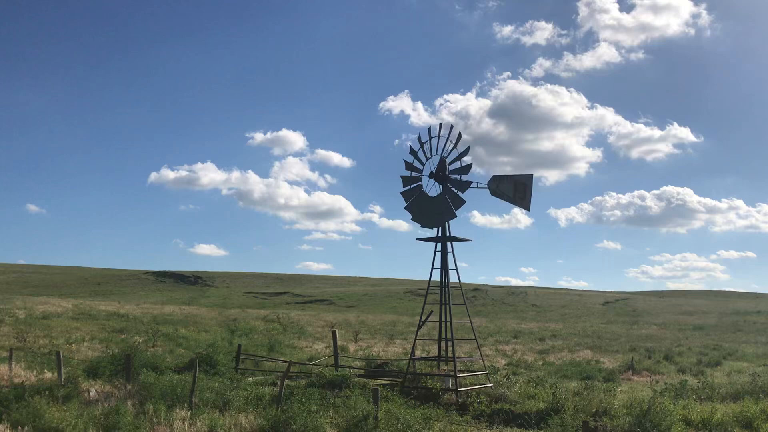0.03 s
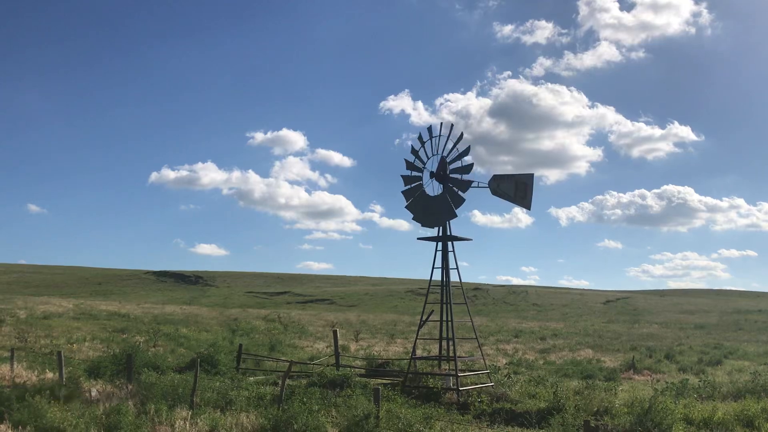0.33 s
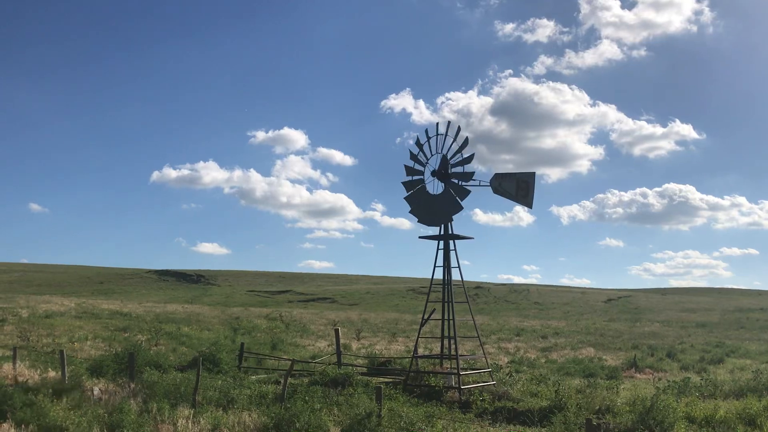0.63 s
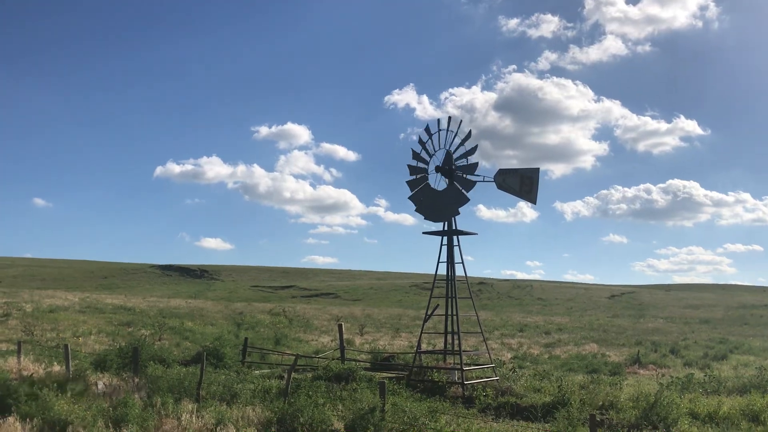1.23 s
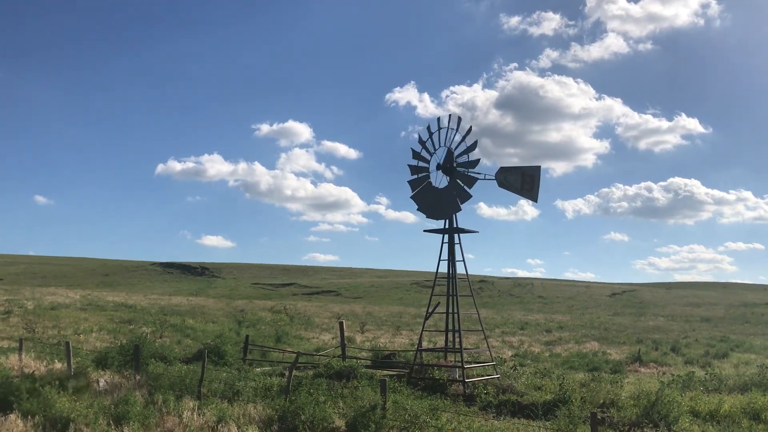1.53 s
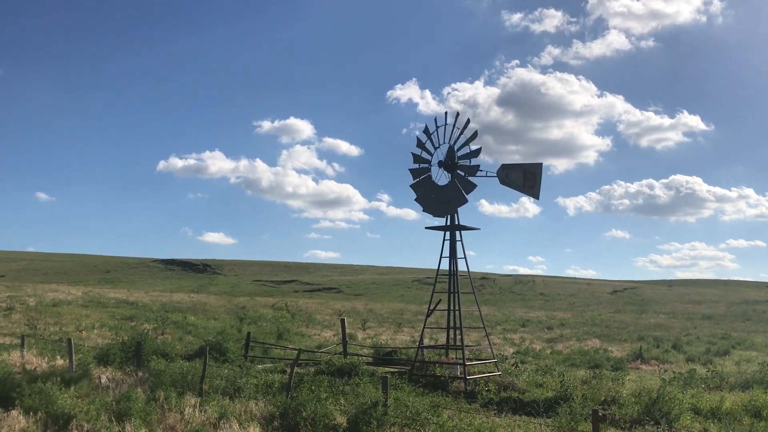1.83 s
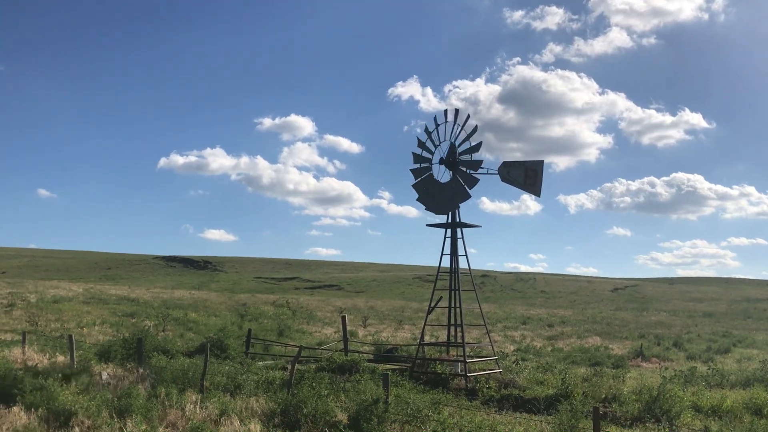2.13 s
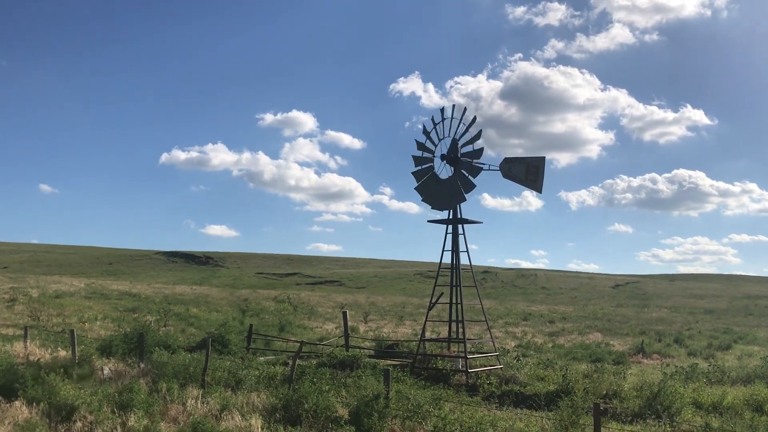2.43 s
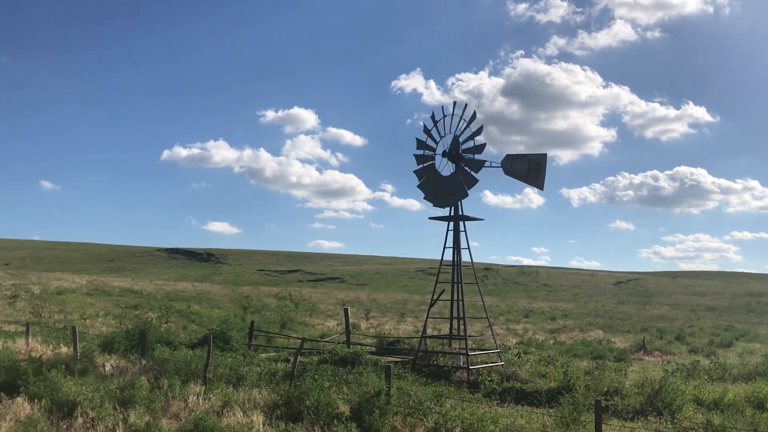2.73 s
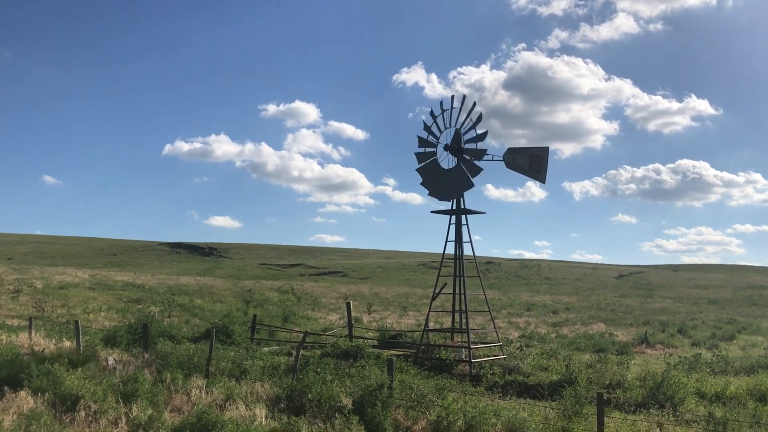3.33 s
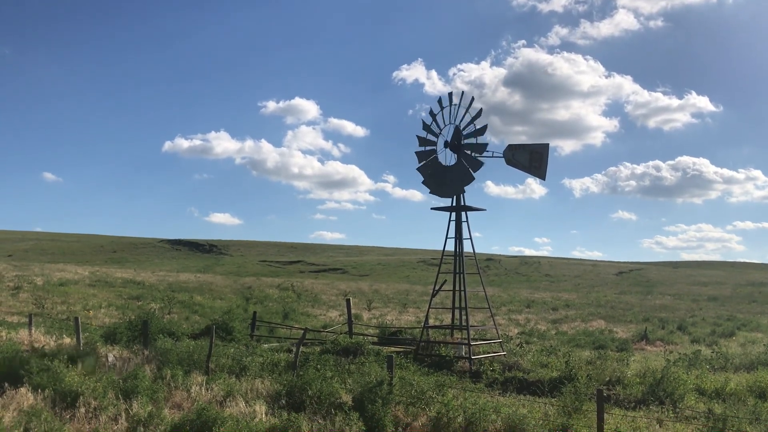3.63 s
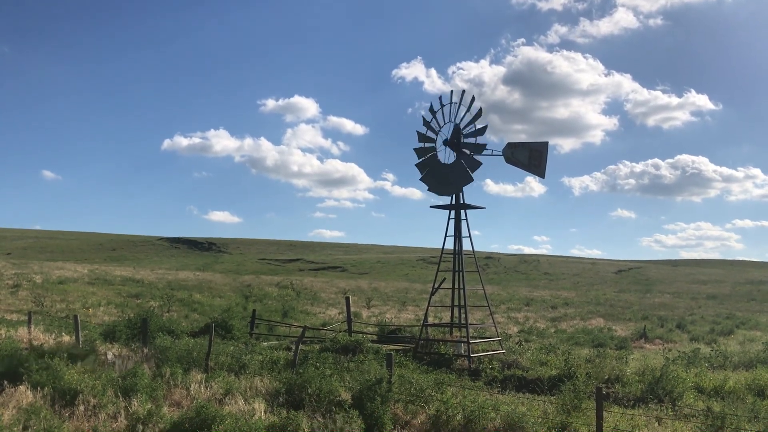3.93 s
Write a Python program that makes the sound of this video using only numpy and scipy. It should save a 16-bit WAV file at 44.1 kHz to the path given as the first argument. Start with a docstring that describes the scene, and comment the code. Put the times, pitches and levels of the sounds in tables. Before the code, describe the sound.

Gusty wind rumbles on the microphone, with crickets chirping and one distant bang.

```python
"""Wind buffets the microphone in uneven gusts, rumbling and thumping, on an open prairie.
Grass hisses, ticks and brushes together. Crickets scrape their wings: one chirps close by and one
further out, over a far chorus of trills and chirps and the high rattle of katydids.
A few distant bangs roll over the hills, and a far bird adds thin calls and a falling whistle."""
import sys
import numpy as np
from scipy import signal
from scipy.fft import rfft, irfft
from scipy.io import wavfile
from scipy.ndimage import uniform_filter1d

SR = 44100
rng = np.random.default_rng(int(sys.argv[2]) if len(sys.argv) > 2 else 0)


def store_pcm(level_fs):
    """Save levels as 16-bit WAV."""
    pcm = np.round(np.clip(level_fs, -1, 1) * 32767).astype(np.int16)
    wavfile.write(sys.argv[1], SR, np.atleast_2d(pcm).T)


N = 176400
T = np.arange(N) / SR
FREQS = np.fft.rfftfreq(N, 1 / SR)


def amp(db):
    """Turns decibels into a number to multiply a sound by."""
    return 10 ** (np.asarray(db) / 20)


def unit(x):
    """Scales a sound to an average strength (rms) of 1."""
    return x / np.sqrt(np.mean(x ** 2) + 1e-30)


def read(points, hz):
    """Looks up a table by frequency, sliding smoothly between its rows."""
    freqs, values = np.transpose(points)
    return np.interp(np.log(hz + 1), np.log(freqs), values)


def add(mix, at, sound):
    """Mixes a sound in, starting at a time in seconds."""
    part = mix[max(round(at * SR), 0):][:len(sound)]
    part += sound[:len(part)]


def noise(colour):
    """Noise with a given colour: its balance of low and high frequencies."""
    return unit(irfft(rfft(rng.standard_normal(N)) * amp(read(colour, FREQS)), N))


def drift(hz):
    """A random wobble, mostly slower than the given rate."""
    return unit(irfft(rfft(rng.standard_normal(N)) / (1 + (FREQS / hz) ** 4), N))


def rise_and_fade(rise_s, fade_s):
    """A loudness shape that climbs quickly and dies away, losing 60 dB every fade_s."""
    return np.minimum(T / rise_s, 1) * amp(-60 * T / fade_s)


def scatter(sound, fade_s):
    """The blur of many tiny echoes from grass and ground."""
    t = T[:SR // 2]
    tail = rng.standard_normal(len(t)) * amp(-60 * t / fade_s) * (t > .003)
    return signal.fftconvolve(sound, tail / np.linalg.norm(tail))[:N]


def turbulence(colour, swirl_db, window):
    """Noise broken into short swirls, then evened out over a window of samples."""
    rough = noise(colour) * amp(swirl_db)
    power = uniform_filter1d(uniform_filter1d(rough ** 2, window), window)
    return rough / np.sqrt(power + 1e-12)


# how the gusts rise and fall (time [s], relative rumble level [dB], relative flutter level [dB])
GUSTS = [(.04, -20, -23.5), (0.059, -28.5, -36), (0.089, -32, -41), (0.138, -25, -31.5), (0.191, -38, -48),
         (.22, -27, -36.5), (0.259, -37.5, -59), (0.306, -16.5, -25), (.32, -35, -30), (0.342, -27, -42),
         (0.402, -28, -42), (0.434, -44, -72), (0.459, -29.5, -38), (0.488, -36.5, -52), (0.519, -28, -48),
         (.58, -28.5, -38.5), (.66, -32, -34), (.695, -30.5, -47), (.75, -29.5, -40), (.82, -36, -55),
         (0.866, -27, -29.5), (.89, -31.5, -42.5), (0.942, -31.5, -40.5), (1.021, -48.5, -86),
         (1.06, -40.5, -79), (1.1, -45, -78), (1.151, -25.5, -49), (1.17, -24, -41.5), (1.221, -33, -45.5),
         (1.265, -47.5, -74), (1.288, -29, -65), (1.325, -44, -67), (1.374, -26, -60), (1.414, -31, -33),
         (1.462, -25.5, -45.5), (1.52, -48, -68), (1.6, -52.5, -88), (1.63, -38, -56), (1.69, -28.5, -51),
         (1.79, -30, -41.5), (1.821, -37, -55), (1.895, -23, -39.5), (1.919, -34, -46.5),
         (2.05, -32, -46.5), (2.069, -41, -63), (2.098, -29.5, -43), (2.351, -31.5, -52),
         (2.409, -23.5, -32.5), (2.48, -32.5, -42), (2.556, -28.5, -37), (2.591, -45, -64),
         (2.69, -43.5, -81), (2.734, -30.5, -35), (2.822, -31, -37.5), (2.86, -30, -41.5),
         (2.895, -30.5, -37), (2.94, -32, -46.5), (2.98, -25, -37), (3.02, -34, -58), (3.07, -27.5, -40.5),
         (3.129, -33, -35), (3.175, -47, -69.5), (3.261, -26.5, -41.5), (3.36, -47.5, -62),
         (3.428, -30, -40.5), (3.47, -33.5, -53.5), (3.53, -30, -40), (3.59, -48, -69), (3.69, -43.5, -65),
         (3.768, -29, -53.5), (3.82, -38.5, -57), (3.91, -30.5, -56.5), (3.99, -24, -36)]
# colours of the deep rumble and the flutter above it (frequency [Hz], level [dB])
RUMBLE_COLOUR = [(15, -34), (28, -21.5), (50, -1.5), (85, 3), (160, 0.5), (250, -3), (340, -15.5),
                 (480, -43), (800, -52), (1600, -76)]
FLUTTER_COLOUR = [(100, -8), (250, 6.5), (380, 3.5), (560, -2.5), (760, -17.5), (1050, -28.5),
                  (1600, -41.5), (3000, -51.5), (8000, -75)]
# single swirls of air that hit the microphone (time [s], peak level [dB], half width [s])
THUMPS = [(0.059, -23, 0.00093), (.140, -17.5, 0.0011), (.302, -10.5, 0.0016), (.318, -21, 0.0011),
          (.359, -35, 0.00069), (.610, -13.5, 0.0014), (.654, -20, 0.0015), (.866, -21.5, 0.001),
          (.937, -31, 0.0016), (1.172, -19.5, 0.0016), (2.045, -33, 0.00098), (2.441, -16.5, 0.0015),
          (2.778, -19.5, 0.0016), (2.981, -20, 0.0014), (3.07, -22, 0.0011)]


def wind():
    """Gusts drive a rumble and a rougher flutter; the hardest swirls land as single thumps."""
    times, rumble_db, flutter_db = np.transpose(GUSTS)
    swirls = drift(hz=53.3)
    rumble = turbulence(RUMBLE_COLOUR, 2 * swirls, window=1300)
    flutter = turbulence(FLUTTER_COLOUR, 4.5 * swirls, window=1400)
    out = rumble * amp(np.interp(T, times, rumble_db) + .5)
    out += flutter * amp(np.interp(T, times, flutter_db) + 2.5)
    for at, db, half_width in THUMPS:
        offset = (T - at) / half_width
        out += amp(db) * (1 - 3 * offset ** 2) / (1 + offset ** 2) ** 3  # a push between two dips
    low_cut = signal.butter(2, 19.2, "high", fs=SR, output="sos")
    return signal.sosfilt(low_cut, out)


# colour of the hissing grass (frequency [Hz], level [dB])
HISS_COLOUR = [(30, 5), (200, 21.5), (600, 4.5), (1000, 4.5), (2000, -4), (3300, -6), (4900, -6.5),
               (7000, -8.5), (8400, -9), (10500, -9.5), (16000, -18)]


def grass_hiss():
    """The soft, steady hiss of grass in the breeze."""
    return amp(-64.5) * noise(HISS_COLOUR)


def wing_stroke(hz, sag_hz_per_s, length_s=.016, snap_hz=0, rise_s=.0016):
    """One wing scrapes the other's ridges; the tone sags as the scrape slows."""
    t = np.arange(0, length_s, 1 / SR)
    pitch = hz - sag_hz_per_s * t + snap_hz * np.exp(-t / .00065)  # the snap lifts the very start
    phase = 2 * np.pi * np.cumsum(pitch) / SR
    edges = np.minimum(t / rise_s, 1) * np.minimum((length_s - t) / .0035, 1)
    droop = 1 - .27 * t / length_s
    return edges * droop * (np.sin(phase) + amp(-21.5) * np.sin(2 * phase))


# far crickets that trill without a break (pitch [Hz], strokes per second [1/s], level [dB])
TRILLS = [(4268, 59.5, -68.5), (4245, 62, -72.5), (3893, 45, -78.5)]


def trilling_crickets():
    """Endless runs of quick wing strokes at a slightly uneven pace, blurred by distance."""
    out = np.zeros(N)
    sag_hz_per_s = 45000
    for hz, rate, db in TRILLS:
        trill, length_s = np.zeros(N), .74 / rate
        top_hz = hz + sag_hz_per_s * length_s / 2
        late, detune, loudness = rng.standard_normal((280, 3)).T
        starts = np.cumsum(1 + .05 * late) / rate
        for at, start_hz, stroke_db in zip(starts, top_hz + 25 * detune, .79 * loudness):
            add(trill, at, amp(stroke_db) * wing_stroke(start_hz, sag_hz_per_s, length_s, rise_s=.0051))
        out += amp(db) * unit(trill + amp(-2.5) * scatter(trill, fade_s=.2))
    return out


def cricket_chorus():
    """Three-stroke chirps from many far crickets merge into a shimmer."""
    out = np.zeros(N)
    chirps_per_s = 14
    for slot, (late, detune, loudness) in enumerate(rng.random((chirps_per_s * N // SR, 3))):
        stroke = amp(8 * loudness) * wing_stroke(5320 + 380 * detune, sag_hz_per_s=16000, rise_s=.003)
        for n in range(3):
            add(out, (slot + late) / chirps_per_s + n * .032, stroke)
    return amp(-85.5) * unit(out + 1.2 * scatter(out, fade_s=.51))


def rasp(colour, level_db, beat_hz, depth, grain_db):
    """Tiny wing teeth strike in a dry rasp, pulsed by the wing beat; when faint it blurs into a hiss."""
    pace_hz = beat_hz * (1 + .046 * drift(hz=12))
    beat = np.sin(2 * np.pi * np.cumsum(pace_hz) / SR)
    clarity = np.interp(level_db, [-77, -66], [0, 1])
    pulses = 1 + depth * clarity * np.tanh(2 * beat)
    teeth = noise(colour) * amp(grain_db * drift(hz=500))
    return amp(level_db) * unit(teeth * pulses)


# loudness of two katydids (time [s], lower singer's level [dB], higher singer's level [dB])
KATYDID_LEVELS = [(.05, -70, -71), (0.171, -65, -66), (.27, -64.5, -64), (.39, -72.5, -69),
                  (.5, -72.5, -68), (.62, -68, -67), (.75, -69.5, -73), (1.09, -67, -66), (1.25, -73, -71),
                  (1.68, -73, -74), (1.77, -72, -63), (1.98, -75, -85), (2.12, -76, -71),
                  (2.55, -74.5, -72), (2.9, -74, -73), (3.39, -77.5, -67), (3.53, -67.5, -59),
                  (3.62, -71, -71), (3.73, -69, -64), (3.97, -75.5, -81)]
# colours of their rasps (frequency [Hz], level [dB])
LOW_RASP_COLOUR = [(7000, -39), (10500, -28), (11400, -5), (12100, -8), (12550, -1.5), (13050, 1),
                   (13700, -11), (14300, -1.5), (15800, -7)]
HIGH_RASP_COLOUR = [(7000, -40), (11000, -31.5), (13500, -11), (14500, 1), (15700, -2), (17000, -5.5)]


def katydids():
    """Two katydids, relatives of crickets, swell and fade in the waving grass."""
    times, low_db, high_db = np.transpose(KATYDID_LEVELS)
    lower = rasp(LOW_RASP_COLOUR, np.interp(T, times, low_db), beat_hz=43, depth=.86, grain_db=1.5)
    higher = rasp(HIGH_RASP_COLOUR, np.interp(T, times, high_db), beat_hz=48, depth=.26, grain_db=3)
    return lower + higher


# chirps of the near cricket (time [s], last stroke's level [dB], average stroke spacing [s],
# first stroke's length [s], first stroke's level [dB])
NEAR_CHIRPS = [(0.077, -50.5, 0.032, 0.015, -56), (.337, -51, .0335, 0.0076, -54),
               (0.663, -50, 0.032, 0.014, -52.5), (1.282, -48.5, 0.034, 0.015, -55),
               (1.542, -48, 0.031, 0.014, -51.5), (1.867, -48, .034, 0.009, -54),
               (2.222, -47.5, .033, 0.014, -52.5), (2.886, -47, 0.032, 0.012, -56)]


def near_cricket():
    """Three wing strokes to a chirp, each higher and louder than the one before."""
    out = np.zeros(N)
    wing_hz, glide = 5862, dict(sag_hz_per_s=33300, snap_hz=340)
    for at, db, spacing, first_s, first_db in NEAR_CHIRPS:
        add(out, at, amp(first_db) * wing_stroke(wing_hz - 130, length_s=first_s, **glide))
        add(out, at + .92 * spacing, amp(db - 1.5) * wing_stroke(wing_hz - 30, length_s=.01648, **glide))
        add(out, at + 2 * spacing, amp(db) * wing_stroke(wing_hz, **glide))
    out *= 1 + .14 * drift(hz=700)  # slight roughness
    return out + amp(-19) * scatter(out, fade_s=.15)


# chirps of a cricket further out (time [s], level [dB])
FAINT_CHIRPS = [(.195, -71), (0.439, -70), (.94, -74), (1.19, -72), (3.36, -76), (3.6, -77)]


def faint_cricket():
    """A fainter cricket, with three equal wing strokes to a chirp."""
    out = np.zeros(N)
    stroke = wing_stroke(5600, sag_hz_per_s=22000, rise_s=.0017)
    for at, db in FAINT_CHIRPS:
        for n in range(3):
            add(out, at + n * .036, amp(db) * stroke)
    return out + .5 * scatter(out, fade_s=.2)


# ticks of dry stalks (time [s], level [dB])
TICKS = [(.43, -61), (3.72, -73)]
# colour of a tick (frequency [Hz], level [dB])
TICK_COLOUR = [(1000, -14), (3000, 9), (5000, 3), (7100, 2), (9000, -4), (15000, -2)]


def stalk_ticks():
    """Dry grass stalks tick: sudden bits of noise that die at once."""
    out = np.zeros(N)
    for at, db in TICKS:
        add(out, at, amp(db) * noise(TICK_COLOUR) * amp(-60 * T / .06))
    return out


# distant bangs (time [s], level [dB])
BANGS = [(.812, -62), (1.41, -69), (1.753, -67), (2.312, -48)]
# colour of a bang (frequency [Hz], level [dB])
BANG_COLOUR = [(200, -5), (700, -9), (1050, -2), (1230, -1), (1345, 5.5), (1460, -7), (1750, -5),
               (1900, -5.5), (2250, -4.5), (2750, -8.5), (3100, -11.5), (3370, -4), (3650, -16),
               (4500, -15), (6500, -30), (12000, -44)]
# how long a bang lingers (frequency [Hz], time to fade by 60 dB [s])
BANG_FADES = [(300, 0.8), (1300, 0.64), (3000, 0.58), (8000, 0.52)]
# later echoes from the hills (time [s], level [dB])
ECHOES = [(1.075, -65), (2.71, -62)]
# colour of the rolls and echoes (frequency [Hz], level [dB])
ECHO_COLOUR = [(200, -3), (900, 0.5), (1400, -1), (2200, -8.5), (3400, -14.5), (6000, -28.5),
               (12000, -51.5)]


def bangs():
    """Each far bang is a burst that loses its highs first; the hills send back a duller roll."""
    out = np.zeros(N)
    for at, db in BANGS:
        hz, t, bands = signal.stft(noise(BANG_COLOUR), SR, nperseg=256)
        fades = amp(-60 * t / read(BANG_FADES, hz)[:, None])
        _, burst = signal.istft(bands * fades, SR, nperseg=256)
        add(out, at, amp(db) * burst[:N] * np.minimum(T / .006, 1))
        add(out, at, amp(db - 10.5) * noise(ECHO_COLOUR) * rise_and_fade(.027, 4))
    for at, db in ECHOES:
        add(out, at, amp(db) * noise(ECHO_COLOUR) * rise_and_fade(.018, 2.8))
    return out


# flicks of grass blades (time [s], level [dB])
FLICKS = [(1.635, -69), (1.74, -64), (2.11, -68), (2.445, -66), (2.7, -63), (2.725, -66), (2.825, -63),
          (2.985, -63), (3.245, -67), (3.52, -59)]
# colour of a flick (frequency [Hz], level [dB])
FLICK_COLOUR = [(6000, -32), (11000, -10), (13500, -5), (15500, -5)]


def blade_flicks():
    """Blades of grass brush together in short, very high flicks."""
    loudness = np.zeros(N)
    for at, db in FLICKS:
        add(loudness, at, amp(db) * rise_and_fade(.003, .09))
    return loudness * noise(FLICK_COLOUR)


# the bird's thin, high calls (time [s], pitch [Hz], level [dB])
THIN_CALLS = [(1.665, 10450, -80), (3.332, 10250, -64)]
# the path of its whistle (time [s], pitch [Hz], relative level [dB])
WHISTLE = [(3.8, 3900, -73), (3.899, 3490, -66), (4.0, 3190, -76)]


def bird():
    """A far bird gives thin ringing calls and one falling whistle, smeared by distance."""
    calls = np.zeros(N)
    for at, hz, db in THIN_CALLS:
        tone = np.sin(2 * np.pi * hz * T + 1.4 * drift(hz=170))
        add(calls, at, amp(db) * tone * rise_and_fade(.0032, .22))
    times, hz, db = np.transpose(WHISTLE)
    pitch = np.interp(T, times, hz) + 207 * drift(hz=400)
    whistle = np.sin(2 * np.pi * np.cumsum(pitch) / SR) * amp(np.interp(T, times, db, left=-140))
    return calls + .6 * whistle + scatter(whistle, fade_s=.69)


def scene():
    """Wind, grass, insects and far sounds, added into one channel."""
    background = wind() + grass_hiss() + trilling_crickets() + cricket_chorus() + katydids()
    events = near_cricket() + faint_cricket() + stalk_ticks() + bangs() + blade_flicks() + bird()
    return (background + events)[None]


def record(dry):
    """The sound begins after a moment of silence, and the very highest sounds are cut off."""
    start_s, top_hz = .036, 15800
    opened = dry * np.clip((T - start_s) / .002, 0, 1)
    high_cut = signal.firwin(1023, top_hz, window=("kaiser", 9), fs=SR)
    return signal.oaconvolve(opened, high_cut[None], "same")


dry = scene()
out = record(dry)
store_pcm(out)
```